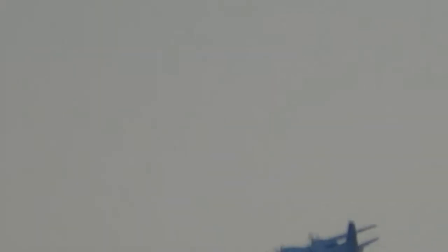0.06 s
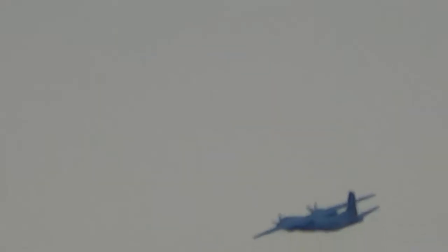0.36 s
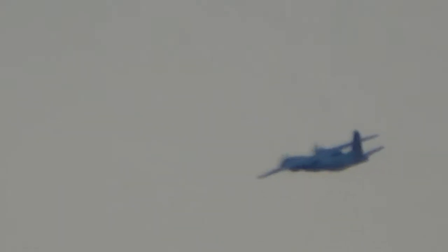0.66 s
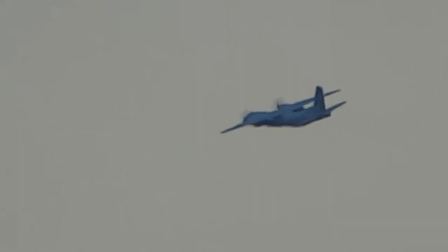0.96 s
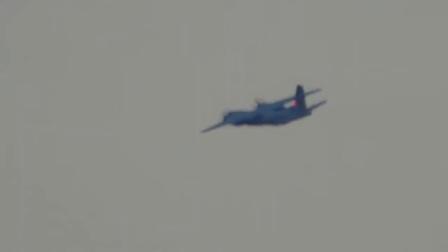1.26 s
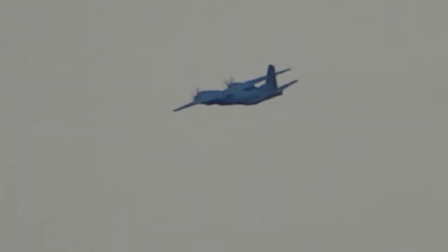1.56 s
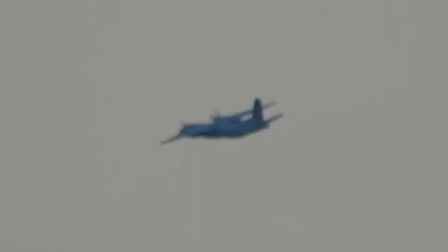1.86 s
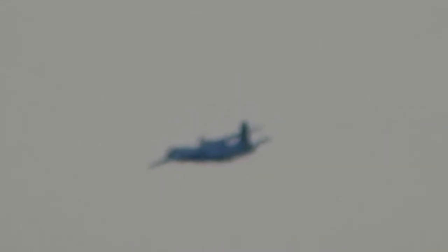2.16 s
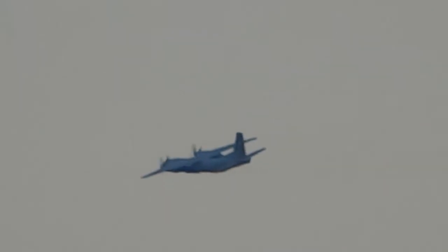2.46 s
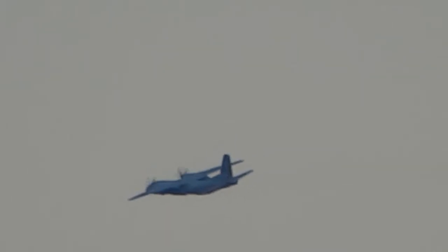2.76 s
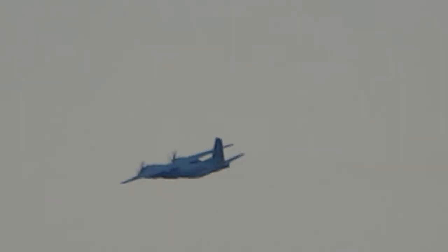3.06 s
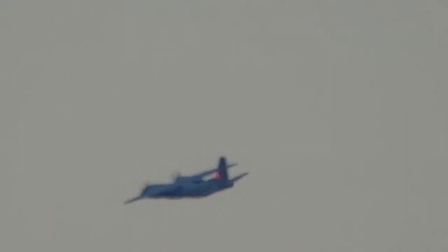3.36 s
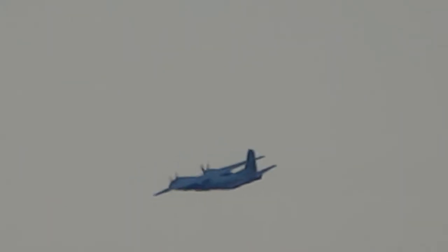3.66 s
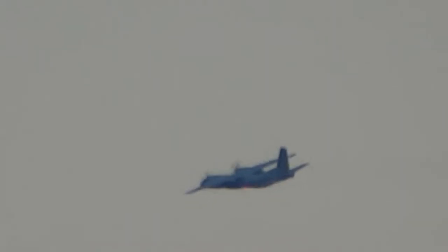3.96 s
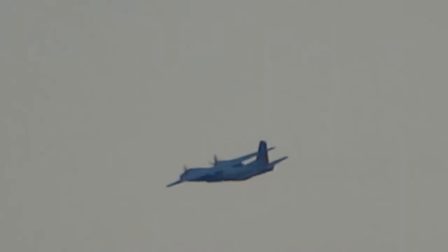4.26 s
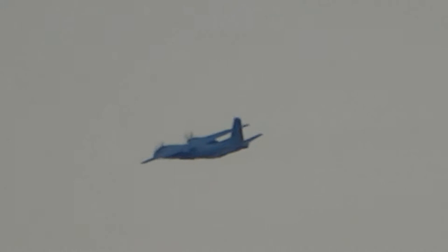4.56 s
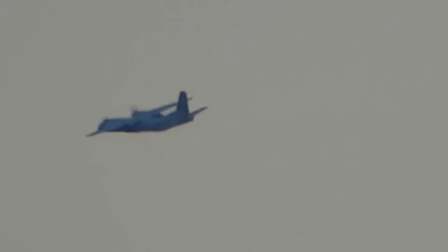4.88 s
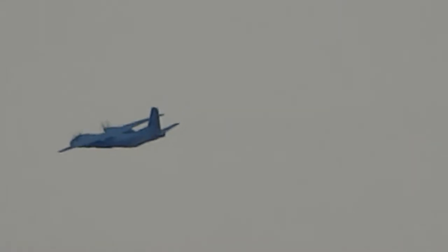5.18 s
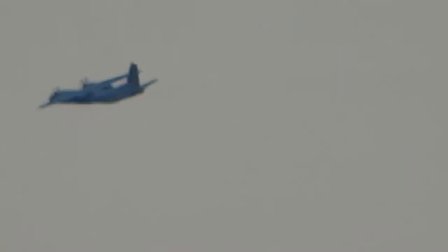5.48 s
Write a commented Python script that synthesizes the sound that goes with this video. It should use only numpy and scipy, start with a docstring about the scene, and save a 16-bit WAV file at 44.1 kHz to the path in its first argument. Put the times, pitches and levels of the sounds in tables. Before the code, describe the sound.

Outdoors in a town street, a faint rumble and a brief low hum open as swifts begin to scream. Their thin, rising, buzzing calls overlap, grow loud as the flock races close to the microphone, and break into short chips before receding. A few soft hollow scuffs and quick dry rattles pass underneath, and the house fronts add a short echo.

```python
"""A faint town rumble and a brief hum, and at once a party of swifts races in: thin rising screams
overlap, swell and recede. Each scream is a buzzing 3 kHz voice whose second harmonic carries nearly
all the power; many break up into chips. A few hollow scuffs and dry rattles pass, and the house fronts
echo the birds. The rumble, with its far-off calls, sinks under the loudest screams."""
import sys
import numpy as np
from scipy import signal
from scipy.fft import rfft, irfft, next_fast_len
from scipy.io import wavfile
from scipy.ndimage import uniform_filter1d, map_coordinates

SR = 44100
rng = np.random.default_rng(int(sys.argv[2]) if len(sys.argv) > 2 else 0)


def master_out(mix):
    """Clip the mix to full scale and print it as 16-bit PCM to the path in sys.argv[1]."""
    frames = np.transpose(np.atleast_2d(mix))
    ceiling = np.clip(frames, -1, 1)
    pcm = np.round(ceiling * 32767).astype(np.int16)
    wavfile.write(sys.argv[1], SR, pcm)


N = 252252
T = np.arange(N) / SR


def from_db(db):
    """Decibels to gain."""
    return 10 ** (np.asarray(db) / 20)


def rms_one(x):
    """Scale to unit power."""
    return x / np.sqrt(np.mean(x ** 2) + 1e-20)


def colour(x, points):
    """EQ by a curve of (freq_hz, gain_db) points."""
    hz, db = np.transpose(points)
    size = next_fast_len(N + SR // 10)
    bins = np.maximum(np.fft.rfftfreq(size, 1 / SR), 1)
    gain = from_db(np.interp(np.log(bins), np.log(hz), db))
    return irfft(rfft(x, size) * gain, size)[..., :N]


def drift(rate_hz, size):
    """Smooth random modulation with a spread of about 1."""
    steps = np.arange(size) * rate_hz / SR
    knots = np.arange(0, steps[-1] + 1, .125)
    targets = rng.standard_normal(int(steps[-1]) + 3)
    return np.interp(steps, knots, map_coordinates(targets, [knots], order=2, mode="mirror"))


def street(x, t60_s, wet_db, wall_s, wall_db):
    """Direct sound, a slap off a wall and a diffuse, nearly mono tail from the house fronts."""
    t = T[:SR]
    tail = rng.standard_normal((2, SR)) * from_db(-60 * t / t60_s) * np.minimum(t / 0.031, 1)
    mid, side = from_db(wet_db) * tail / np.sqrt(np.sum(tail ** 2) / 2)
    response = 1.76 * mid + 0.13 * side * np.array([[1], [-1]])
    response[:, 0] += 1
    response[:, int(wall_s * SR)] += from_db(wall_db)
    return signal.fftconvolve(x[None], response, axes=1)[:, :N]


# Stereo width of the noise layers: freq_hz, side_minus_mid_db
NOISE_WIDTH = [(40, -46), (250, -21.5), (800, -13), (4000, -15)]
def noise(points):
    """Coloured stereo noise, centred in the bass."""
    mid, side = colour(rng.standard_normal((2, N)), points)
    return rms_one(mid + colour(side, NOISE_WIDTH) * np.array([[1], [-1]]))


# Level of the background bed, which sinks while the screams are loudest: time_s, level_db
BED_LEVEL = [(0, -50.5), (2.7, -48.5), (2.95, -62), (3.4, -59), (3.55, -67), (3.95, -66), (4.2, -61.5),
             (5.72, -51.5)]
# Tone of the town rumble: freq_hz, gain_db
RUMBLE_EQ = [(20, -6), (60, -2), (160, 0.5), (600, -2.5), (1600, -14.5), (2300, -22.5), (4200, -20.5),
             (9000, -72)]
# Tone of the wash of distant birds: freq_hz, gain_db
WASH_EQ = [(2300, -67), (2900, 1), (3500, -26), (4500, -4.5), (5300, 5.5), (5900, 11.5), (6600, -11.5),
           (8000, -11.5), (10000, -22), (12000, -34), (15000, -72)]
# Far-off calls that stand out of the bed: centre_s, pitch_hz, level_db
CLEAR_CALLS = [(.84, 2390, -55), (.89, 664, -51), (1.56, 699, -51.5), (1.7, 799, -52.5), (1.72, 2630, -58),
               (2.25, 1133, -50), (2.55, 917, -49)]
def town(wash_db=-1, calls_db=-11, whistles_db=-18):
    """A bed of rumble and distant birds that sinks while the flock is closest, plus a few clear calls."""
    bed_level = from_db(np.interp(T, *np.transpose(BED_LEVEL)))
    rumble = from_db(drift(8.9, N)) * noise(RUMBLE_EQ)
    wash = from_db(wash_db + 3.7 * drift(14, N)) * noise(WASH_EQ)
    chorus = from_db(calls_db) * far_chorus(660, 1900, count=80)
    chorus += from_db(whistles_db) * far_chorus(3100, 2300, count=36)
    calls = far_calls(CLEAR_CALLS, bend=0.014) + bed_level * chorus
    return bed_level * (rumble + wash) + street(calls, t60_s=.5, wet_db=-6, wall_s=.03, wall_db=-10)


def far_calls(notes, bend):
    """Faint notes from far away, each a wavering arch of pitch with a random tilt."""
    out = np.zeros(N + SR)
    for centre_s, hz, db in notes:
        u = np.linspace(-1, 1, int(rng.uniform(.14, .22) * SR))
        pitch = hz * (1 + bend * rng.standard_normal() * u - .03 * u ** 2 + .018 * drift(120, len(u)))
        swell = from_db(db) * np.cos(np.pi * u / 2) ** 2
        first = max(int(centre_s * SR) - len(u) // 2, 0)
        out[first:first + len(u)] += swell * np.sin(2 * np.pi * np.cumsum(pitch) / SR)
    return out[:N]


def far_chorus(strong_hz, weak_hz, count):
    """A random scatter of far calls, softer towards weak_hz; unit power."""
    when, toward_weak, softness = rng.random((count, 3)).T
    pitch_hz = strong_hz * (weak_hz / strong_hz) ** toward_weak
    notes = zip(when * N / SR, pitch_hz, -6 * (softness + toward_weak))
    return rms_one(far_calls(notes, bend=.05))


def hum(pitch_hz=205, level_db=-45, octave_db=-11, end_s=0.453):
    """A low, nearly steady tone with its octave, soon over."""
    phase = 2 * np.pi * np.cumsum(pitch_hz + 2.1 * drift(13.0, N)) / SR
    gate = np.clip(np.minimum(T - .01, end_s - T) / 0.026, 0, 1)
    tone = np.sin(phase) + from_db(octave_db) * np.sin(2 * phase)
    return from_db(level_db + 2 * drift(25.6, N)) * gate * tone


def add_voice(out, start_s, phase, swell, third_db, fourth_db):
    """Mix in four harmonics; phase is the second's, and the weak fundamental follows the third."""
    first = max(int(start_s * SR), 0)
    for k, db in enumerate((third_db - 24.5, 0, third_db, fourth_db), 1):
        harmonic = from_db(db) * swell * np.sin(k * phase / 2)
        out[first:first + len(phase)] += harmonic[:max(N - first, 0)]


def scream(length_s, start_hz, held_hz, drift_hz, slur_s, buzz_rad, rasp_rad):
    """Effort lifts pitch and level; flapping membranes buzz; the voice tires into a hoarse stutter."""
    buzz_hz, wander_hz, waver_hz, rasp_hz = 275, 25, 16, 1300
    stutter_s, stutter_hz, drop_hz = .1, 33, 600
    onset_db, tired_db, flutter_db = -12, -8.5, 2.5
    t = np.arange(int(length_s * SR)) / SR
    size, progress = len(t), t / t[-1]
    slack = np.exp(-t / slur_s)   # effort still to build up
    tired = progress ** 3
    breakup = np.clip(1 - (t[-1] - t) / stutter_s, 0, 1)
    syllable = (stutter_hz * t + 0.161 * drift(29.82, size) + rng.random()) % 1
    pitch = start_hz * slack + (held_hz + drift_hz * (progress - .5)) * (1 - slack)
    pitch += wander_hz * drift(24.89, size) + waver_hz * drift(90.56, size)
    pitch -= drop_hz * breakup * syllable ** 2
    flap_hz = buzz_hz * (1 + 0.074 * rng.standard_normal() + 0.087 * drift(69.95, size))
    flap = 2 * np.pi * np.cumsum(flap_hz) / SR
    hoarse = rasp_rad * (0.36 + 1.14 * tired)
    jitter = .6 * drift(rasp_hz, size) + .05 * drift(5000, size)   # rasp and a trace of hiss
    buzz = buzz_rad * np.sqrt(progress) * np.sin(flap)
    phase = 2 * np.pi * np.cumsum(pitch) / SR + buzz + hoarse * jitter
    swell = from_db(onset_db * slack + tired_db * tired + flutter_db * drift(80.06, size))
    swell *= 1 + 0.95 * buzz_rad * np.cos(flap)
    swell *= 1 - breakup * np.cos(2 * np.pi * syllable)
    return phase, swell * np.clip(np.minimum(t / 0.014, (t[-1] - t) / 0.019), 0, 1)


def overtones(size, peak_s=0.11, width_s=0.086, fall_db=8, flicker_db=2, flicker_hz=59):
    """Swing in dB of a scream's odd harmonics, which flare early, and of its fourth; all flicker."""
    flare = np.exp(-((T[:size] - peak_s) / width_s) ** 2)
    odd_db = fall_db * (flare - 1) + flicker_db * drift(flicker_hz, size)
    return odd_db, flicker_db * drift(flicker_hz, size)


# Scream cues; pitches are those of the second harmonic, and third and fourth are set against it:
# start_s, end_s, start_hz, held_hz, drift_hz, slur_s, level_db, buzz_rad, rasp_rad, third_db, fourth_db
SCREAM_CUES = [(0.086, 0.298, 4640, 5114, -270.0, 0.071, -33, 0.45, 0.2, -56, -29.5),
               (0.376, 0.659, 5200, 5840.0, 248, 0.11, -41, 0.18, 0.3, -32, -29),
               (0.628, 0.923, 4610, 6200, -420.0, 0.051, -30, 0.29, 0.53, -27, -34),
               (1.194, 1.503, 5150, 6206, 334, 0.029, -31.5, 0.17, 0.41, -13.5, -23.5),
               (1.308, 1.672, 6060.0, 6560, 240.0, 0.058, -38.4, 0.11, 1.3, -28, -32),
               (1.623, 1.92, 4567, 6360, -390.0, 0.075, -21.5, 0.39, 0.51, -29, -26.5),
               (1.74, 2.153, 5360, 5914, 188, 0.013, -32.5, 0.87, 3.2, -14.5, -17.5),
               (2.116, 2.44, 4850, 6120, -27, 0.031, -24.5, 0.32, 0.8, -11.5, -19),
               (2.205, 2.56, 4990.0, 6654, 91, 0.026, -20, 0.47, 0.8, -39, -20.5),
               (2.221, 2.532, 4724, 6170, 363, 0.082, -19.5, 0.61, 1, -37.5, -25),
               (2.489, 2.89, 5354, 6104, -12, 0.024, -20, 0.18, 1.3, -23, -15.5),
               (2.535, 2.901, 5265, 5900, 175.5, 0.042, -24, 1.07, 1.84, -12.5, -18),
               (2.779, 3.199, 5480, 6840, -310.0, 0.064, -24, 0.45, 1.2, -23, -16),
               (2.783, 3.25, 5060.0, 6317, 127, 0.021, -18.5, 0.62, 1.53, -19, -11.5),
               (2.862, 3.23, 4840.0, 6125, 34, 0.013, -25, 0.78, 0.28, -22, -22),
               (3.058, 3.422, 5646, 6370.0, -210.0, 0.071, -16.5, 0.51, 1.24, -6.5, -12),
               (3.283, 3.639, 4890.0, 5920, 600.5, 0.028, -24.5, 1.24, 0.89, -8, -5.5),
               (3.374, 3.757, 4784, 6393, -520.0, 0.057, -13, 0.69, 0.79, -23.5, -16),
               (3.413, 3.709, 4810, 5700, -440.0, 0.026, -24.5, 0.68, 0.38, -17.5, -9),
               (3.728, 4.098, 4937, 6157, -600.0, 0.052, -15, 0.56, 1.4, -15, -17.5),
               (3.767, 4.082, 4580, 5570, 186, 0.11, -21, 0.3, 0.4, -34, -15.5),
               (3.777, 4.025, 4485, 6350, 172, 0.042, -17, 0.22, 0.37, -17, -11.5),
               (4.034, 4.318, 4570, 5680, 279.5, 0.022, -18.5, 0.59, 0.73, -10.5, -21),
               (4.243, 4.631, 4496, 5582, -250.0, 0.022, -25, 0.45, 0.96, -21, -17),
               (4.318, 4.513, 4520.0, 5555, -140.0, 0.041, -38, 0.45, 0.49, -3.5, -4),
               (4.522, 4.791, 4970, 6035, 475, 0.022, -26.5, 0.33, 1.2, -17, -24.5),
               (4.607, 4.967, 5080, 6560, 275, 0.081, -31.5, 0.67, 2.3, -25, -21),
               (4.763, 5.101, 4420, 5720.0, 9, 0.026, -34.5, 0.63, 2.9, -24, -30),
               (4.928, 5.268, 4560.0, 5410.0, 378, 0.036, -35.5, 0.66, 1.46, -19.5, -22.5),
               (4.966, 5.396, 4240.0, 5244, 225.5, 0.044, -37, 0.58, 0.41, -36, -25),
               (5.124, 5.529, 4655, 5724, 265, 0.12, -35.5, 0.34, 1.1, -22.5, -24),
               (5.291, 5.696, 5024, 6115, 680.0, 0.09, -37.5, 0.27, 1.5, -16.5, -33),
               (5.648, 5.734, 4690, 5800, -44, 0.024, -33, 0.36, 3.1, -19, -29)]
def screams():
    """The overlapping screams of the passing flock."""
    out = np.zeros(N)
    for start, end, *contour, db, buzz_rad, rasp_rad, third_db, fourth_db in SCREAM_CUES:
        phase, swell = scream(end - start, *contour, buzz_rad, rasp_rad)
        odd_db, top_db = overtones(len(phase))
        add_voice(out, start, phase, from_db(db) * swell, third_db + odd_db, fourth_db + top_db)
    return out


def chip(hz, glide_oct, length_s, rasp_rad):
    """A short gliding note with a quick attack."""
    u = np.linspace(0, 1, int(length_s * SR))
    pitch = hz * 2 ** (glide_oct * (u - .5))
    phase = 2 * np.pi * np.cumsum(pitch) / SR + rasp_rad * drift(1784, len(u))
    return phase, np.minimum(10 * u, 1) * np.cos(np.pi * u / 2)


def stray_chips(pitch_ratio=.87, softer_db=8, glide_oct=-.15):
    """Each tiring scream sheds one lower chip in its second half."""
    notes = []
    for start, end, _, held_hz, _, _, db, *_ in SCREAM_CUES:
        when, height = rng.random(2)
        hz = held_hz * pitch_ratio * (.95 + .1 * height)
        notes.append((end - when * (end - start) / 2, hz, db - softer_db, glide_oct))
    return notes


# Runs of chips, the shortest a single chip: start_s, end_s, first_pitch_hz, level_db, glide_oct
CHIP_RUNS = [(0.333, .405, 5760, -37, -0.031), (0.873, .88, 5150, -33, 0.031),
             (0.898, .975, 5670, -26.5, 0.087), (1.693, 1.70, 4420, -38, 0.29),
             (2.487, 2.5, 4640, -32, 0.42), (2.89, 2.91, 5350, -23.5, .27), (3.168, 3.18, 5100, -32, 0.12),
             (3.439, 3.45, 5170, -29.5, 0.27), (3.655, 3.72, 5660, -19, -0.011),
             (3.721, 3.78, 5070, -18, -0.066), (3.736, 3.745, 4630, -28, -.5),
             (3.75, 3.76, 5500, -15, -.05), (4.045, 4.06, 5950, -12.5, -.07),
             (4.124, 4.135, 5580, -9, -.17), (4.166, 4.185, 4850, -22, -0.95),
             (4.44, 4.49, 5200, -35, -0.12)]
def chips(gap_s=.03, fall_oct=.05, fade_db=2.2):
    """Runs of chips, each lower and softer than the last, plus the strays."""
    notes = [(s, hz * 2 ** (-fall_oct * k), db - fade_db * k, glide_oct)
             for start, end, hz, db, glide_oct in CHIP_RUNS
             for k, s in enumerate(np.arange(start, end, gap_s))]
    out = np.zeros(N)
    for s, hz, db, glide_oct in notes + stray_chips():
        phase, swell = chip(hz, glide_oct, length_s=.016, rasp_rad=.2)
        add_voice(out, s - .004, phase, from_db(db) * swell, third_db=-25, fourth_db=-22)
    return out


# Resonances of throat and beak: freq_hz, gain_db
BEAK_EQ = [(2000, 5.5), (2900, 5), (4000, -0.5), (5000, -3), (5900, 4.5), (6500, 4), (7000, 3), (7800, 13),
           (8400, 7.5), (9400, -0.5), (10200, 0), (12000, -2), (13200, -14.5), (15000, -6)]
def swifts():
    """All screams and chips, coloured by throat and beak."""
    return colour(screams() + chips(), BEAK_EQ)


# Scuff cues: start_s, level_db, length_s
SCUFF_CUES = [(1.034, -51.5, 0.034), (1.783, -39, 0.075), (1.847, -48, 0.078), (2.301, -44.5, 0.077),
              (3.312, -44.5, 0.09), (4.005, -52, 0.1), (4.08, -60.5, 0.46), (4.796, -48, 0.086),
              (5.591, -44, 0.073)]
# Hollow tone of a scuff: freq_hz, gain_db
SCUFF_EQ = [(100, -10), (280, -10.5), (400, -1), (560, -0.5), (850, -12.5), (1050, -10), (1330, -2.5),
            (1750, -2.5), (2500, -14), (3300, -6.5), (4300, -18), (8000, -48)]
def scuffs(tail_db=-11, tail_s=0.087, boom_hz=385, boom_db=-38, boom_width_hz=60):
    """Short hollow bursts of friction, each with a dying echo; the hardest also boom."""
    swell = np.zeros(N)
    for start, db, length in SCUFF_CUES:
        t = np.maximum(T - start, 0)
        stroke = np.sin(np.pi * np.minimum(t / (1.07 * length), 1))
        echo = np.minimum(t / length, 1) * np.exp(-np.maximum(t - length, 0) / tail_s)
        swell += from_db(db) * (stroke + from_db(tail_db) * echo)
    phase = 2 * np.pi * boom_hz * T
    boom = drift(boom_width_hz, N) * np.sin(phase) + drift(boom_width_hz, N) * np.cos(phase)
    return swell * noise(SCUFF_EQ) + from_db(boom_db) * (swell / swell.max()) ** 2 * boom


# Dry rattle cues: start_s, end_s, tick_rate_hz, pitch_hz, level_db
RATTLE_CUES = [(2.041, 2.193, 62, 4540, -30), (2.803, 2.914, 67, 4450, -34), (3.11, 3.26, 99, 6550, -37),
               (3.977, 4.085, 89, 5890, -31)]
def rattles(octave_db=-3):
    """Quick trains of falling ticks, each with its octave; the pitch sags along the train."""
    out = np.zeros(N)
    for start, end, rate_hz, hz, db in RATTLE_CUES:
        for s in np.arange(start, end, 1 / rate_hz):
            progress = (s - start) / (end - start)
            phase, swell = chip(hz * (1 - .1 * progress), glide_oct=-.25, length_s=.005, rasp_rad=.15)
            tick = swell * (np.sin(phase) + from_db(octave_db) * np.sin(2 * phase))
            arch = 0.16 + np.sin(np.pi * np.sqrt(progress))
            first = int(s * SR)
            out[first:first + len(tick)] += from_db(db) * arch * tick
    return out


# Stereo balance of the mix, the top leaning right: freq_hz, left_minus_right_db
BALANCE = [(300, 0), (1300, 1), (6000, -1.03), (9000, -1), (13000, -6)]
def scene():
    """Swifts echoing over the street, with scuffs, hum and town below them."""
    birds = street(swifts() + rattles(), t60_s=.5, wet_db=-11, wall_s=.013, wall_db=-15)
    left, right = birds + scuffs() + hum() + town()
    return np.array([colour(left, [(hz, db / 2) for hz, db in BALANCE]),
                     colour(right, [(hz, -db / 2) for hz, db in BALANCE])])


def record(dry, ceiling_db=-11.0, window_samples=90, cutoff_hz=15700):
    """A fast limiter holds the loudest beats down; the top is cut steeply."""
    power = uniform_filter1d(dry.mean(0) ** 2, window_samples)
    power = uniform_filter1d(power, window_samples)
    gain = (1 + (power / from_db(ceiling_db) ** 2) ** 2) ** -.25
    lowpass = signal.ellip(12, .1, 80, cutoff_hz, fs=SR, output="sos")
    return signal.sosfilt(lowpass, gain * dry)


dry = scene()
out = record(dry)
master_out(out)
```